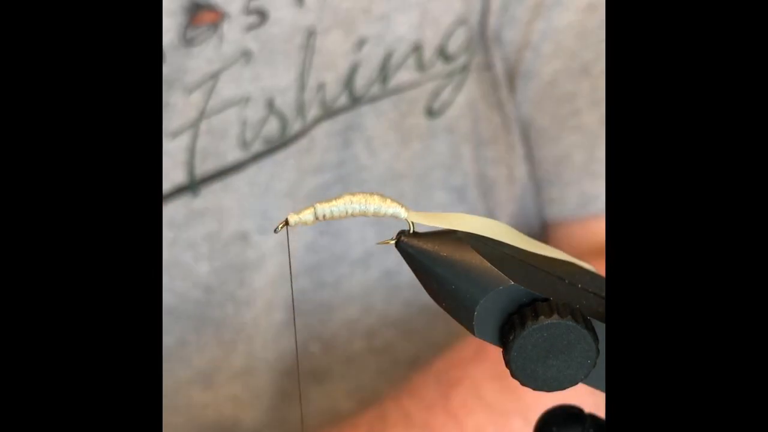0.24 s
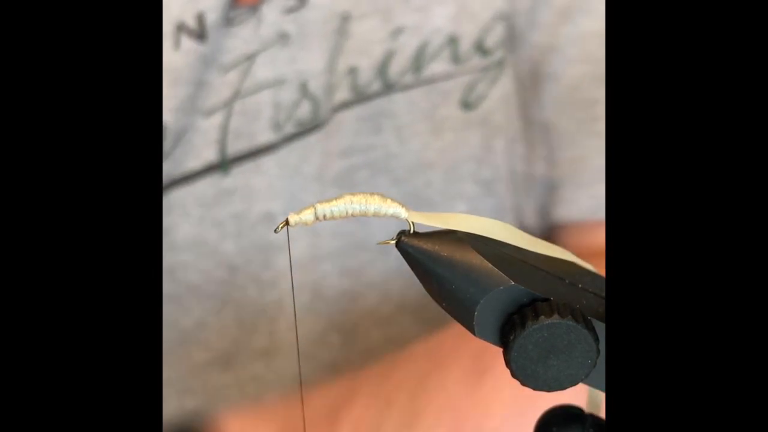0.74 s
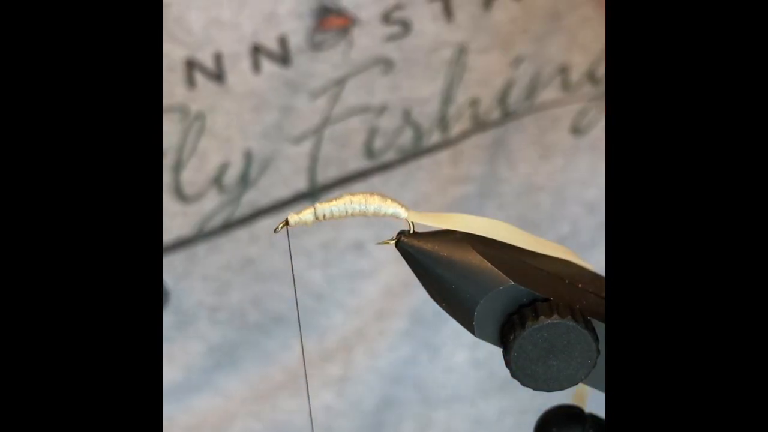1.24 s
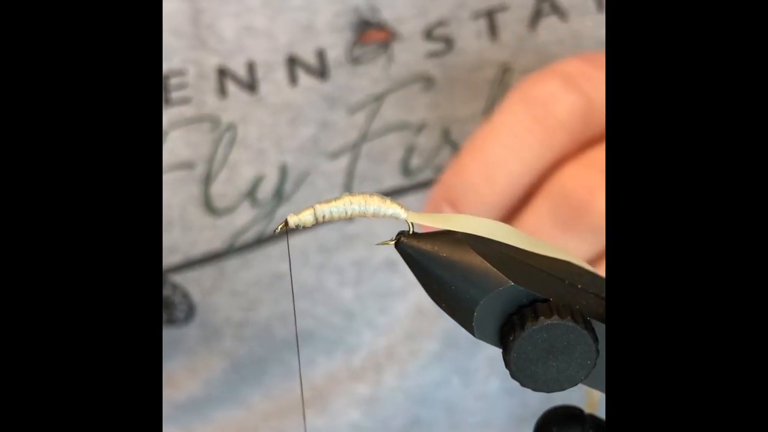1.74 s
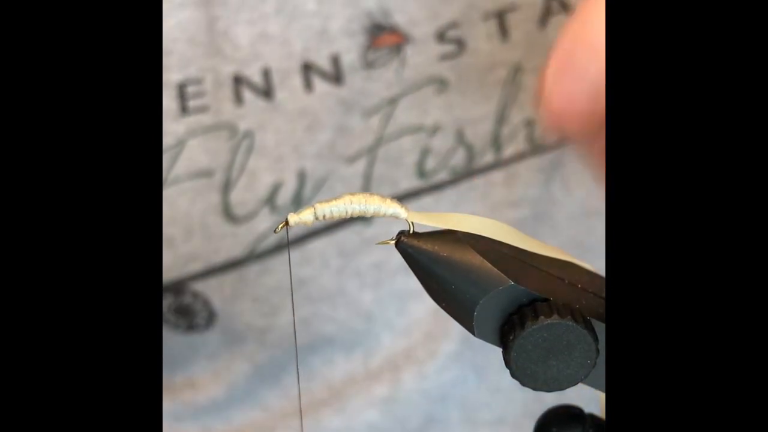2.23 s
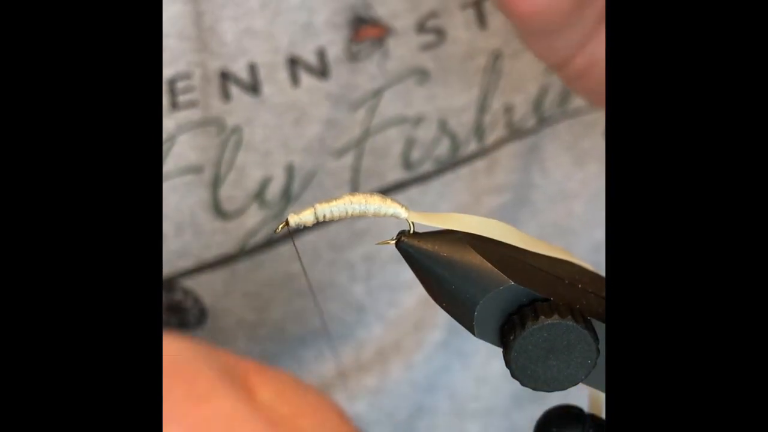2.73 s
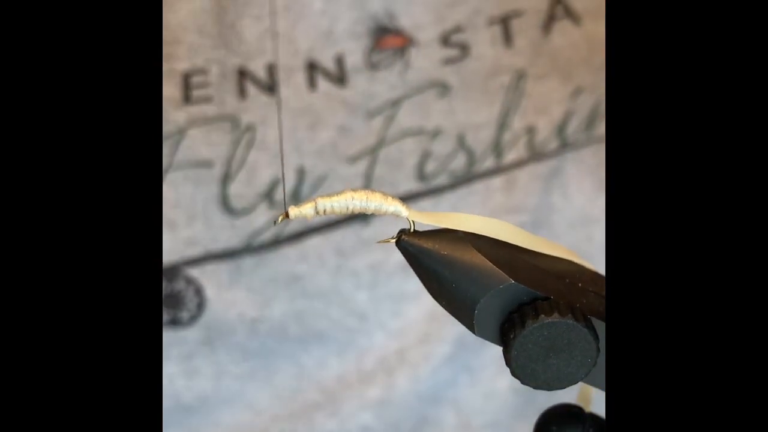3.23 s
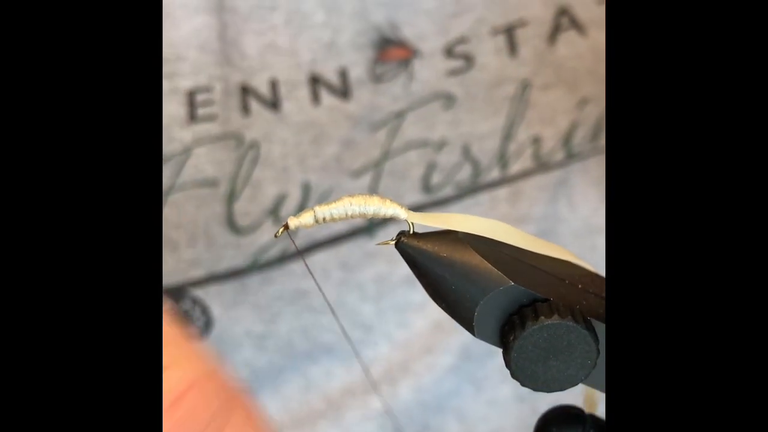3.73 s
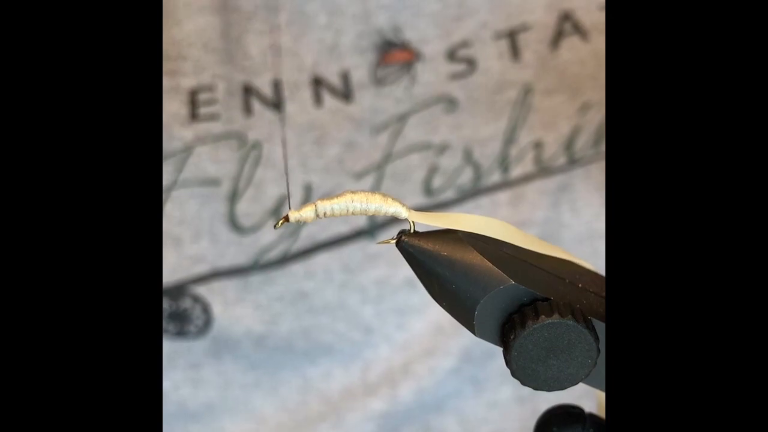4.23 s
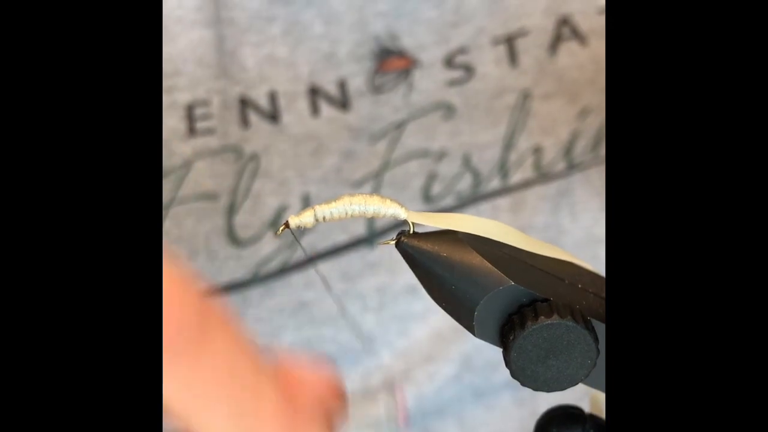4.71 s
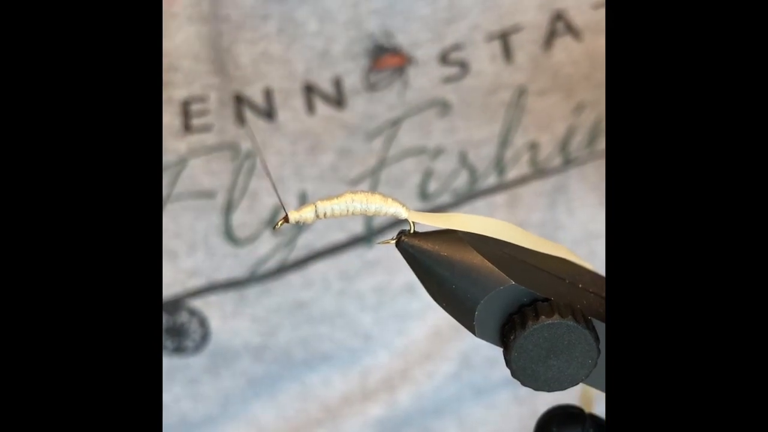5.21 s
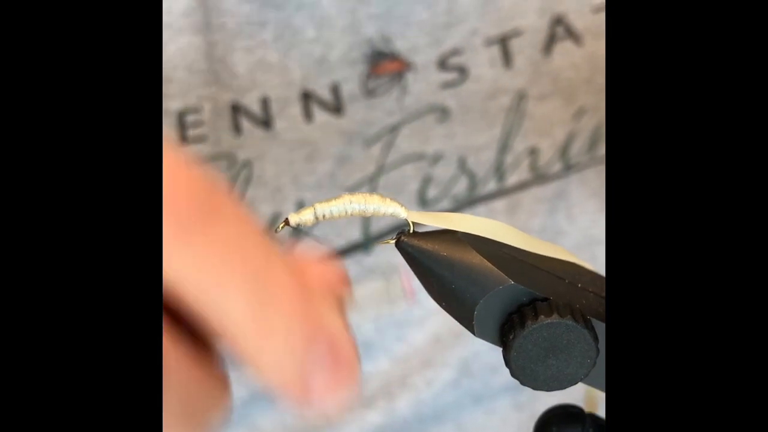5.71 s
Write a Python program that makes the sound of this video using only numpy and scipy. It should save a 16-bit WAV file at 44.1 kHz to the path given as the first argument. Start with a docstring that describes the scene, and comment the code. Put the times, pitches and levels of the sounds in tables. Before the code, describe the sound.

A close microphone at a wooden desk in a small room, with a very quiet low mains hum, duct drone and soft air throughout. At about 0.03-0.05 s scissors are lifted with faint knocks and clinks; at 0.1 s they snap shut in one loud, crisp, bright metallic snip with a short room tail. Very soft finger rubs follow from 0.45 to 0.95 s. From 0.96 to 1.17 s the scissors drop back: a cluster of woody knocks and steel clinks, clearly weaker than the snip. From 1.17 s a loose part bounces in ever quicker, weaker high ticks, gone by 1.4 s. A small dry click comes at 2.12 s, a fainter one at 2.33 s, then almost inaudible rustles and thin thread hiss. Between 3.2 and 5.95 s a bobbin ticks sparsely, clearest near 4.0, 4.4, 4.9, 5.36 and 5.85 s, the last strongest but still faint.

```python
"""Small scissors are lifted from a desk close to the microphone, snip shut, then drop back and clatter.
Grit bursts and ringing steel modes make the blades, damped wooden modes the desk; a loose steel part
bounces to rest in ever shorter flights. Later a thread bobbin ticks faintly as it is wound round, and
filtered noise makes fingers and thread rustle, click and whistle thinly.
A small room answers with a decaying noise tail; mains hum, a droning duct and air noise stay underneath."""
import sys
import numpy as np
from scipy import signal
from scipy.fft import rfft, irfft, next_fast_len
from scipy.io import wavfile
from scipy.ndimage import map_coordinates

SR = 44100
rng = np.random.default_rng(int(sys.argv[2]) if len(sys.argv) > 2 else 0)


def generate_wav(signal):
    """Clip the signal to [-1, 1] and save it as 16-bit WAV at the path in sys.argv[1]."""
    frames = np.transpose(np.atleast_2d(signal))
    scaled = np.clip(frames, -1, 1) * 32767
    pcm = np.round(scaled).astype(np.int16)
    wavfile.write(sys.argv[1], SR, pcm)


N = 262836
T = np.arange(N) / SR

# Blades bite the yarn, shut and rebound: (time [s], level [dB])
SNIP_CONTACTS = [(.0948, -17.5), (0.0968, -10.5), (.1033, -22.5)]
# Dull and bright grit of each contact: (centre [Hz], width [octaves], relative level [dB], t60 [s])
SNIP_GRIT = [(4298, 0.81, -4, .022), (11800, .45, -0.5, .012)]
# Soft broad noise just before the snap: (time [s], peak [dB], centre [Hz], width [octaves], t60 [s])
SOFT_LEAD_IN = [(.0885, -32.5, 4466, 1.3, .05)]
SNIP_RING_DB = -19  # blade ring relative to the grit


def snip():
    """A soft noise leads in, then the blades bite and snap shut: dull and bright bursts with a ring."""
    bursts = [(s, db + level, hz, octaves, t60)
              for s, db in SNIP_CONTACTS
              for hz, octaves, level, t60 in SNIP_GRIT]
    ring = blades([(s, db + SNIP_RING_DB, hz) for s, db, hz, *_ in bursts])
    return grit(SOFT_LEAD_IN + bursts) + ring


# Ringing modes of the steel blades: (frequency [Hz], width [Hz], relative level [dB])
BLADE_MODES = [(2540, 250, -5.5), (3600, 270, -5.5), (4620, 110, 2), (4930, 130, 0.5), (5800, 240, -5.5),
               (9088, 400, -6.5), (10996, 500, -3.5), (12000, 400, -6), (14250, 460, -5)]


def blades(hits):
    """Blade modes struck by (time [s], level [dB], centre [Hz]); duller contacts favour the lower modes."""
    blows = [(s, db, 7 * np.log2(hz / 8000)) for s, db, hz in hits]
    return strike(blows, BLADE_MODES, scatter_db=4, detune=0.01498, pivot_hz=6000)


# Loose blades clink as the scissors are lifted and dropped: (time [s], peak of the grit [dB], centre [Hz])
BLADE_CLINKS = [(.0273, -41.5, 4220), (.0535, -48.5, 5900), (.073, -53.5, 10900), (.9597, -43.5, 9900),
                (.9718, -47.5, 5060), (.9926, -29.5, 5570), (1.0165, -39, 4560), (1.039, -46, 4440),
                (1.05, -44, 4400), (1.054, -55, 7000), (1.101, -42.5, 10300), (1.12, -32, 7900),
                (1.161, -42.5, 6100)]
CLINK_OCTAVES, CLINK_T60_S = 0.72, 0.016
# Ring over grit at 5 kHz [dB] and its change per octave [dB]: brighter clinks ring less
CLINK_RING_DB, CLINK_RING_DB_PER_OCTAVE = -2, -13


def clinks():
    """Loose steel blades touch: short grit and a brief ring."""
    hits = []
    for s, db, hz in BLADE_CLINKS:
        ring_db = CLINK_RING_DB + CLINK_RING_DB_PER_OCTAVE * np.log2(hz / 5000)
        hits.append((s, db + ring_db, hz))
    ring = blades(hits)
    return ring + grit([(s, db, hz, CLINK_OCTAVES, CLINK_T60_S) for s, db, hz in BLADE_CLINKS])


# Knocks on the desk top: (time [s], level [dB], hardness [dB per octave])
DESK_KNOCKS = [(.03, -44.5, 3), (0.0533, -29.5, 1.5), (.098, -23, 10.5), (.105, -42, -11.5), (.285, -44, 9),
               (0.5383, -55, 1), (0.96, -45.5, 3), (.971, -27, 5.5), (.995, -31.5, 8.5), (1.022, -26, 7),
               (1.036, -35, 6.5), (1.05, -27.5, 3.5), (1.082, -34.5, -2.5), (1.1208, -24.5, 2.5),
               (1.165, -34.5, -3)]
# Damped modes of the wooden top: (frequency [Hz], width [Hz], relative level [dB])
DESK_MODES = [(128, 34, -11.5), (276, 30, -3), (364, 45, 0), (539.6, 50, -0.5), (737, 94, -0.5),
              (1132, 61, -4.5), (1353.6, 87, -0.5), (1630, 190, -5), (1860, 170, -10), (2373.4, 120, -11.5),
              (2940, 280, -10), (4396, 400, -21)]
# What knocks rocks back twice: delay, loss and loss of hardness [dB per octave] each time
ROCK_S, ROCK_LOSS_DB, ROCK_SOFTER = .011, 8.5, 4.4


def desk():
    """The wooden top rings and crunches under every knock and its rocking; harder blows are brighter."""
    blows = [(s + ROCK_S * k, db - ROCK_LOSS_DB * k, hardness - ROCK_SOFTER * k)
             for s, db, hardness in DESK_KNOCKS
             for k in range(3)]
    crunch = grit([(s, db - 5.0, 800 * 2 ** (.15 * hardness), .65, .05) for s, db, hardness in blows])
    return strike(blows, DESK_MODES, scatter_db=2.5, detune=0.016, pivot_hz=890) + crunch


# Bounce law of the loose part: first landing and first gap [s], share of each gap kept, first level [dB],
# loss per landing [dB] and its quadratic growth [dB], upper and lower ping limits [Hz],
# low modes over the ping [dB] and their gain per landing [dB]
BOUNCE_LAW = dict(first_s=1.1665, gap_s=.0410, shrink=.835, first_db=-31.5, loss_db=1.5, fade_db=0.14, high_hz=11740, low_hz=10900, spot_db=-7.5, spot_gain_db=1.26)
# Low modes of the part and the wood under it: (frequency [Hz], width [Hz], relative level [dB])
PART_MODES = [(340, 35, -0.5), (1064, 140, 3.5), (1835, 82, -1), (3300, 300, -2)]


def bounces(first_s, gap_s, shrink, first_db, loss_db, fade_db, high_hz, low_hz, spot_db, spot_gain_db,
            count=14):
    """Flights shorten by a fixed share; landings weaken, pings fall and the low modes fade more slowly."""
    k = np.arange(count)
    times = first_s + gap_s * (1 - shrink ** k) / (1 - shrink)
    levels = first_db - loss_db * k - fade_db * k ** 2
    ping_hz = low_hz + (high_hz - low_hz) * 0.73 ** k
    ping = grit([(s, db, hz, .1, .013) for s, db, hz in zip(times, levels, ping_hz)])
    crack = grit([(s, db - 4.5, 10500, .4, .008) for s, db in zip(times, levels)])
    landings = list(zip(times, levels + spot_db + spot_gain_db * k, 0 * k))
    return ping + crack + strike(landings, PART_MODES, scatter_db=1.7, detune=0.013, pivot_hz=1600)


# Bobbin ticks: (time [s], level [dB], brightness [dB per octave])
BOBBIN_TICKS = [(3.2011, -63.5, 0.5), (3.2174, -62, -2.5), (3.4655, -63, -9), (4.0013, -50.5, -0.5),
                (4.0597, -62.5, -3.5), (4.0664, -61.5, -6), (4.1021, -52, -5.5), (4.1684, -61, 15),
                (4.3934, -49.5, 4.5), (4.7884, -63.5, 2.5), (4.8938, -50.5, 2.5), (4.9492, -63, -5),
                (5.0055, -58.5, -2), (5.0384, -64, -4), (5.1417, -62.5, 7.5), (5.2041, -64.5, 4),
                (5.251, -63, 6), (5.2614, -64, 0), (5.3572, -50.5, 3.5), (5.7424, -66, 1.5),
                (5.8486, -44.5, 3), (5.9294, -56, 1)]
# Modes of the spool: (frequency [Hz], width [Hz], relative level [dB])
BOBBIN_MODES = [(2080, 51, -4), (3543, 157, 5.5), (4040, 64, -11.5), (5680, 230, -11), (6080, 93, -4.5),
                (7040, 147, 0.5), (9900, 170, -18), (10200, 160, -14), (12800, 250, -18), (15620, 490, -8)]
# Faint ticks at random while the bobbin swings: start and end [s], strongest level [dB]
SWING_TICKS = dict(from_s=4.0, to_s=5.95, db=-66)


def bobbin():
    """The spool knocks in its wire holder; harder knocks crack more."""
    ticks = BOBBIN_TICKS + jiggle(**SWING_TICKS)
    crack = grit([(s, db - 4.5 + .5 * (db + 52), 9500, .9, .008) for s, db, _ in ticks])
    return strike(ticks, BOBBIN_MODES, scatter_db=3.5, detune=0.016, pivot_hz=3300) + crack


def jiggle(from_s, to_s, db, count=7):
    """Faint ticks of chance time, strength and brightness."""
    chance = rng.random((count, 3))
    return [(from_s + (to_s - from_s) * when, db - 4 * weaker, 8 * (bright - .5))
            for when, weaker, bright in chance]


# Dry clicks of nails and thread: (time [s], peak [dB], centre [Hz], width [octaves])
NAIL_CLICKS = [(.366, -64, 14100, 0.22), (.8, -64, 14470, .15), (1.619, -62.5, 1370, .13),
               (2.1206, -41.5, 8400, 0.62), (2.124, -54, 3350, .12), (2.335, -52.5, 9250, .3),
               (2.4087, -59, 2700, 0.49), (3.076, -62, 12000, .4)]
CLICK_T60_S, CLICK_CYCLES = 0.013, 9.4  # shortest decay; periods added at one octave wide, more if narrower
# Sliding fingers and cloth: (start [s], end [s], level [dB], centre [Hz], sheen relative to it [dB])
FINGER_RUBS = [(0.46, 0.498, -72, 7300, -13), (0.519, 0.647, -69.5, 5000, -2.5),
               (.76, 0.939, -76.5, 4500, -3.5), (2.397, 2.52, -86, 4000, -13.5),
               (2.62, 2.78, -86.5, 4490, -12), (2.792, 2.917, -84, 6500, -2), (2.94, 3.0, -81, 9000, 3),
               (3.071, 3.123, -82, 2470, -15), (3.331, 3.46, -86, 4450, -18), (3.461, 3.55, -86, 9000, 4),
               (3.623, 3.742, -81.5, 2297, -15), (4.194, 4.381, -79.5, 8000, -13)]
RUB_OCTAVES, SHEEN_HZ, SHEEN_OCTAVES = 0.77, 13600, 0.18
# Thread drawn through the bobbin whistles thinly: (start [s], end [s], level [dB], centre [Hz])
THREAD_WHISTLES = [(2.642, 2.756, -93.5, 12380), (2.787, 2.897, -86, 12150), (3.321, 3.41, -95, 12500),
                   (3.47, 3.58, -89, 12050), (4.199, 4.384, -83.5, 6770)]
WHISTLE_OCTAVES = 0.067


def rustle():
    """Slides are grainy hisses that set in quickly and taper off; narrow clicks ring longer."""
    out = grit([(s, db, hz, octaves, CLICK_T60_S + CLICK_CYCLES / hz / octaves)
                for s, db, hz, octaves in NAIL_CLICKS])
    grain = amp(2.3 * wobble(90))
    f = np.fft.rfftfreq(SR // 4, 1 / SR)
    sheen = band(f, SHEEN_HZ, SHEEN_OCTAVES)
    rubs = [(start, end, db, band(f, hz, RUB_OCTAVES) + amp(sheen_db) * sheen)
            for start, end, db, hz, sheen_db in FINGER_RUBS]
    whistles = [(start, end, db, band(f, hz, WHISTLE_OCTAVES)) for start, end, db, hz in THREAD_WHISTLES]
    for start, end, db, colour in rubs + whistles:
        progress = np.linspace(0, 1, round((end - start) * SR))
        swell = np.abs(np.sin(np.pi * progress ** 0.67)) ** 0.57
        hiss = unit(irfft(rfft(rng.standard_normal(SR // 4)) * colour))[:len(progress)]
        at = slice(round(start * SR), round(start * SR) + len(progress))
        out[at] += amp(db) * grain[at] * swell * hiss
    return out


# Decay of the small room: (frequency [Hz], t60 [s])
ROOM_DECAY = [(150, .45), (1000, .62), (3000, 0.57), (6000, 0.45), (9000, .33), (14000, 0.22)]


def room(x, delay_s):
    """The room answers after a delay with a noise tail; each frequency dies at its own speed."""
    hz, t, z = signal.stft(rng.standard_normal(SR), SR, nperseg=256)
    decay = amp(-60 * t / along(ROOM_DECAY, hz)[:, None])
    tail = signal.istft(z * decay, SR, nperseg=256)[1]
    delayed = np.pad(x, (round(delay_s * SR), 0))
    return signal.fftconvolve(delayed, tail / np.linalg.norm(tail))[:N]


# Mains hum: (frequency [Hz], level around which it wavers [dB rms])
MAINS_HUM = [(59.3, -70), (119.5, -84.5)]
# Duct resonance: (frequency [Hz], half-width at half amplitude [Hz], level [dB rms])
DUCT_DRONE = (255, 33, -67)
# Colour of the ventilation air: (frequency [Hz], relative level [dB])
AIR_COLOUR = [(25, -45.5), (50, -22.5), (85, -14.5), (130, -8), (182, -13.5), (259, -8), (433, -18.5),
              (651, -20), (952, -26.5), (1360, -28), (3320, -37.5), (14500, -45), (15500, -51.5),
              (16500, -60)]
AIR_DB = -68.5  # rms level around which the air wavers


def background():
    """Wavering mains tones, noise through a duct resonance and broad air noise."""
    hum = sum(np.sqrt(2) * amp(db + 0.44 * wobble(5.9)) * np.sin(2 * np.pi * hz * T)
              for hz, db in MAINS_HUM)
    hz, width, db = DUCT_DRONE
    drone = amp(db) * noise(lambda f: 1 / (1 + ((f - hz) / width) ** 2))
    air = amp(AIR_DB + wobble(7) / 2) * noise(lambda f: amp(along(AIR_COLOUR, f)))
    return hum + drone + air


def strike(hits, modes, scatter_db, detune, pivot_hz):
    """Blows (time [s], level [dB], tilt [dB per octave]) ring decaying modes at new strengths each time."""
    out, t = np.zeros(N + SR), np.arange(SR // 8) / SR
    hz, width, level = np.transpose(modes)[:, :, None]
    for s, db, tilt in hits:
        chance = rng.standard_normal((3, len(modes), 1))
        gain = amp(level + tilt * np.log2(hz / pivot_hz) + scatter_db * chance[0])
        tone = np.sin(2 * np.pi * hz * (1 + detune * chance[1]) * t) * np.sign(chance[2])
        ring = gain * np.exp(-np.pi * width * t) * tone
        onset = 1 - np.exp(-t * pivot_hz * 2)  # the contact lasts a fraction of a cycle
        out[round(s * SR):][:len(t)] += amp(db) * onset * ring.sum(0) / np.linalg.norm(gain)
    return out[:N]


def grit(rows):
    """Noise bursts (time [s], peak [dB], centre [Hz], width [octaves], t60 [s]): quick rise, fast decay."""
    out, t = np.zeros(N + SR), np.arange(4096) / SR
    f = np.fft.rfftfreq(len(t), 1 / SR)
    for s, db, hz, octaves, t60 in rows:
        hiss = irfft(rfft(rng.standard_normal(len(t))) * band(f, hz, octaves))
        burst = hiss * (1 - np.exp(-t * hz)) * amp(-60 * t / t60)
        out[round(s * SR):][:len(t)] += amp(db) * burst / np.abs(burst).max()
    return out[:N]


def band(hz, centre_hz, octaves):
    """A bell on a log-frequency axis."""
    return np.exp(-.5 * (np.log2((hz + 1) / centre_hz) / octaves) ** 2)


def amp(db):
    """Gain of a level in dB."""
    return 10 ** (np.asarray(db) / 20)


def unit(x):
    """x at rms 1."""
    return x / np.sqrt(np.mean(x ** 2) + 1e-20)


def along(points, hz):
    """Values between (frequency [Hz], value) points on a log axis."""
    f, v = np.transpose(points)
    return np.interp(np.log(hz + 1), np.log(f + 1), v)


def wobble(rate):
    """A smooth random curve, rate knots a second."""
    return map_coordinates(rng.standard_normal(int(N * rate / SR) + 4), [T * rate])


def filtered(x, response):
    """x times a response of frequency."""
    m = next_fast_len(N + SR // 2)
    return irfft(rfft(x, m) * response(np.fft.rfftfreq(m, 1 / SR)), m)[..., :N]


def noise(response):
    """Coloured noise of rms 1."""
    return unit(filtered(rng.standard_normal(N), response))


def scene():
    """Near sources, their echoes and the steady floor; the desk knocks feed the room most strongly."""
    cut, clatter, wood = snip(), clinks(), desk()
    part, spool, hands = bounces(**BOUNCE_LAW), bobbin(), rustle()
    near = cut + clatter + wood + part + spool + hands
    echo = room(amp(-10.5) * cut + amp(-12.5) * clatter + amp(-15) * spool, delay_s=0.0045)
    desk_echo = room(amp(-7) * wood + amp(-14) * part, delay_s=.005)
    hands_echo = amp(-15.5) * room(hands, delay_s=.006)
    return (near + echo + desk_echo + hands_echo + background())[None]


TOP_HZ = 16200  # upper band limit of the microphone


def record(dry):
    """The microphone drops the deep bass and cuts steeply above its band limit."""
    def response(hz):
        edge = 1 / (1 + (hz / TOP_HZ) ** 90)
        return edge ** 2 / (1 + (40 / (hz + 1)) ** 4)
    return filtered(dry, response)


dry = scene()
out = record(dry)
generate_wav(out)
```